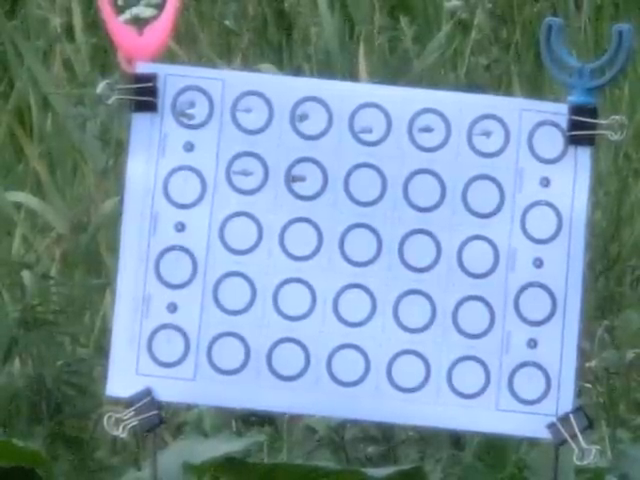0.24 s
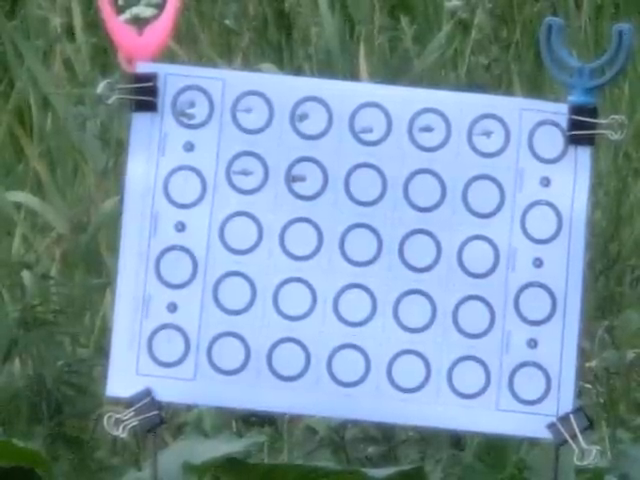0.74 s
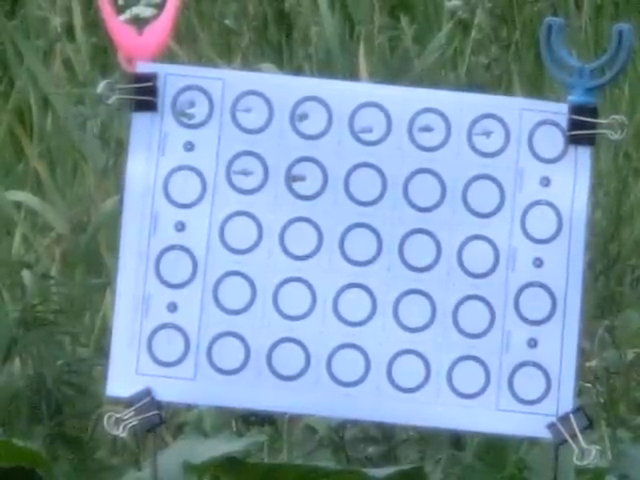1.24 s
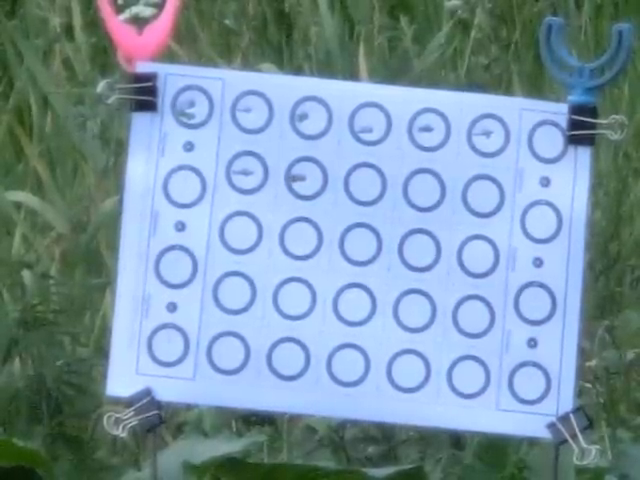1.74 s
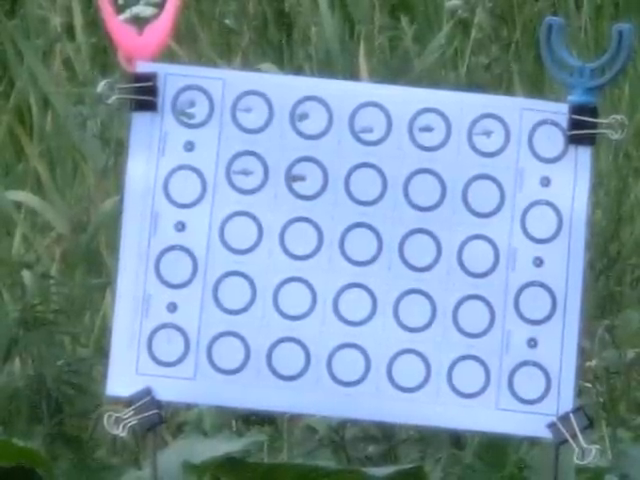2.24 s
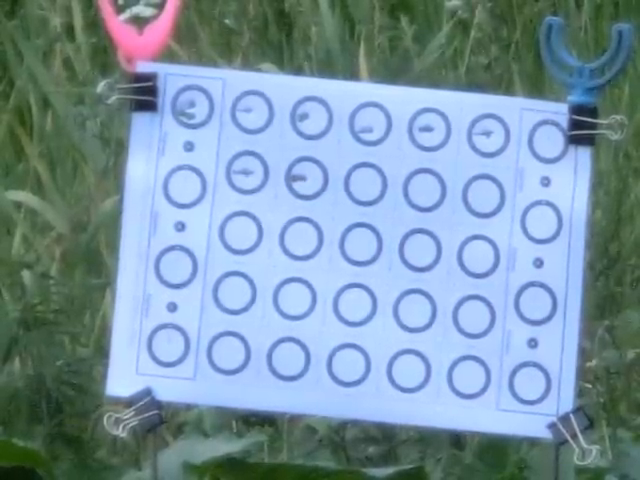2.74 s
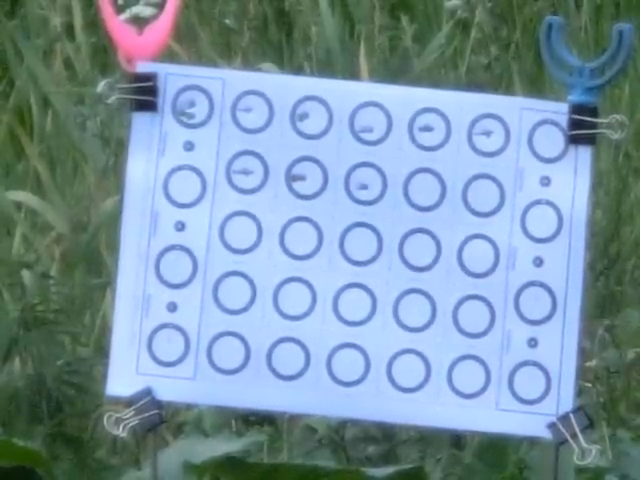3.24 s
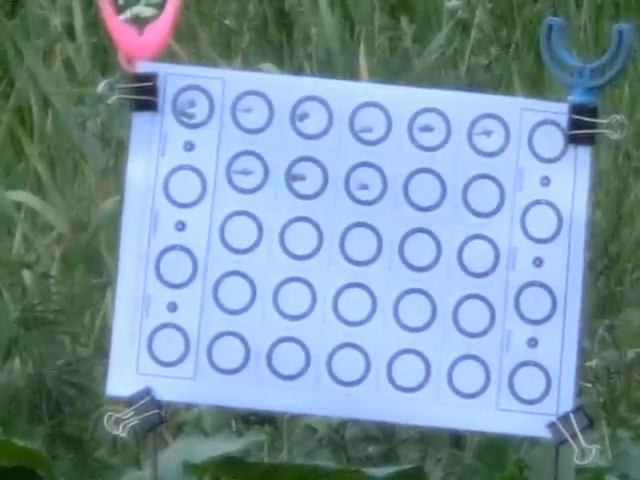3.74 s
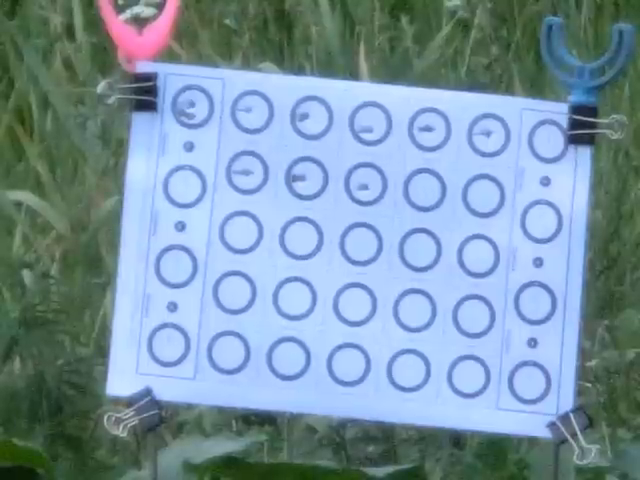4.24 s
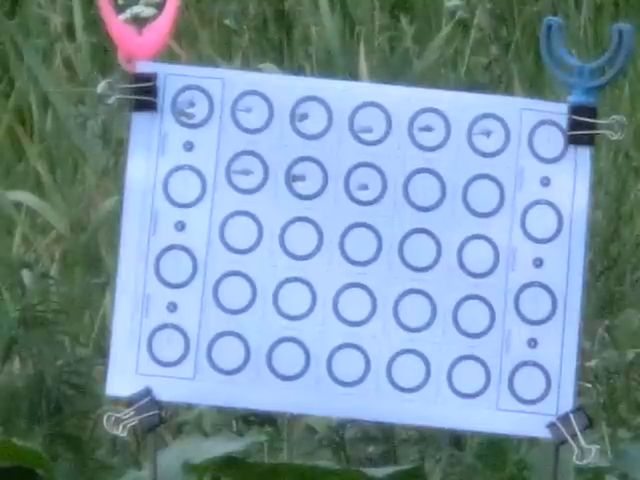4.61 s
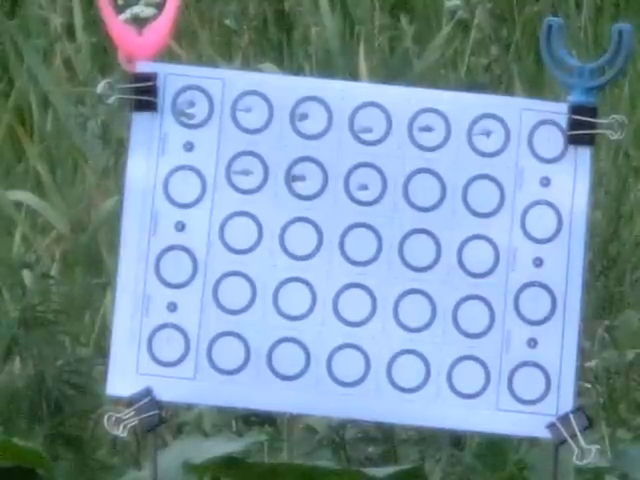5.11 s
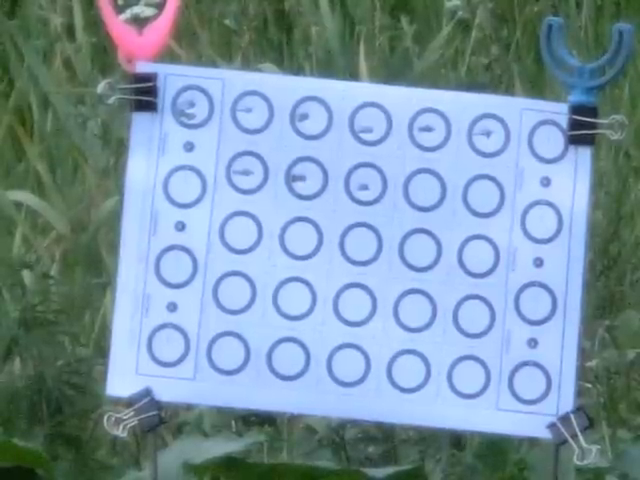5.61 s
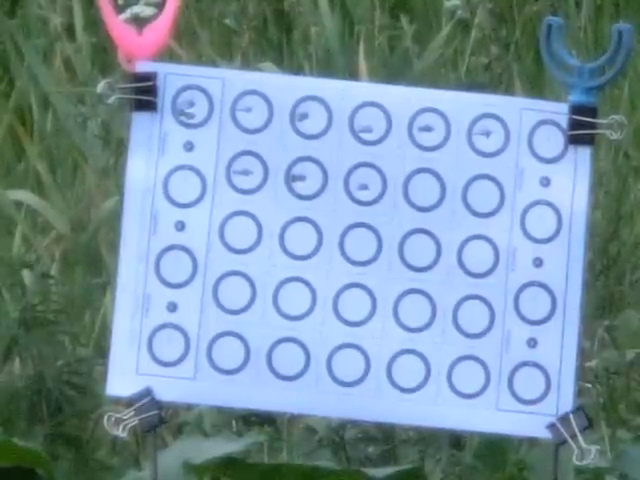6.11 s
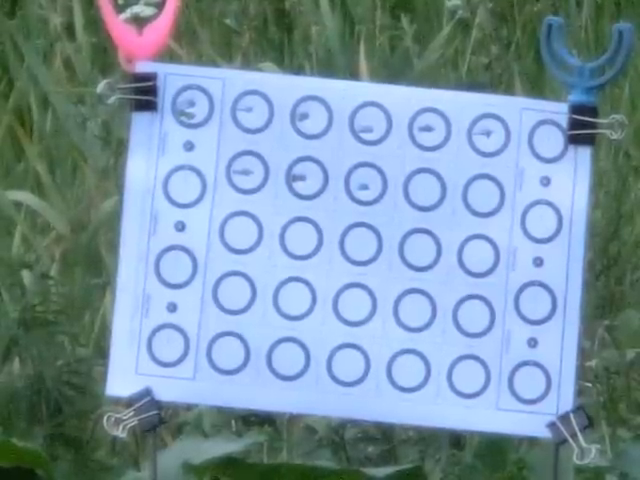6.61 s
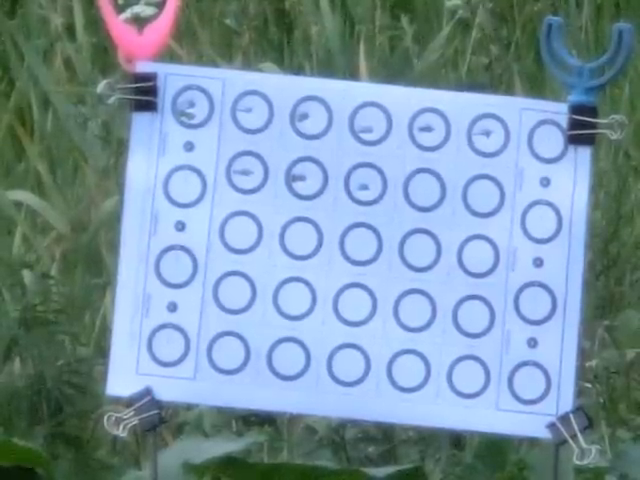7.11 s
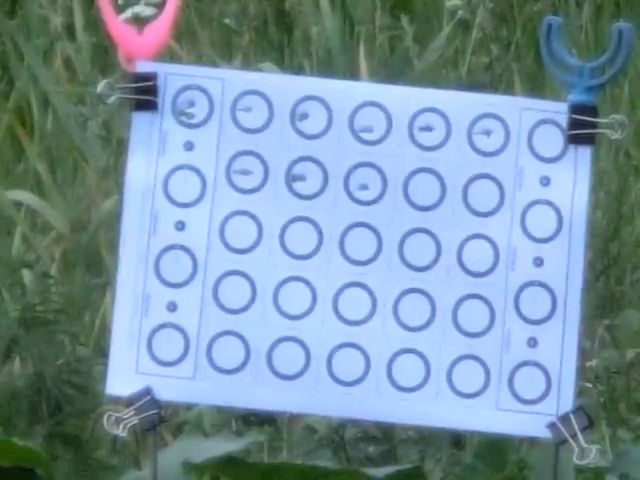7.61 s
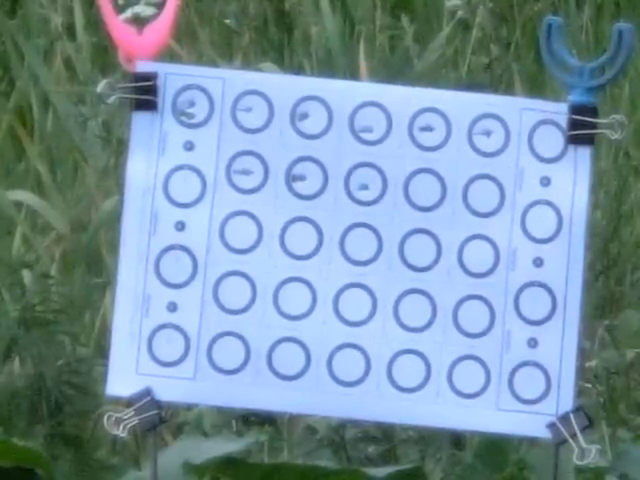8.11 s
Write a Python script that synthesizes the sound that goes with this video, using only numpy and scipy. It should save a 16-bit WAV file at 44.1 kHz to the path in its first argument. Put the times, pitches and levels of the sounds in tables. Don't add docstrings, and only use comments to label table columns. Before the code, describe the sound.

From 0 to 3.1 seconds a quiet meadow: a distant car swells gently closer, peaking near 2.7, with a hollow road wash, low uneven engine throb, light wind, hiss and dry high grasshopper rasps. At 3.16 a pellet hits card right beside the stereo microphone: an extremely loud, clipped, ripping slap with a brief board ring, air thump and bright grassy scatter. About 0.16 seconds later, at 3.32, comes a thin, bass-less rifle crack from afar, with a hissing field echo fading over roughly half a second. The background is suddenly hushed and slowly creeps back. Faint buffeting flutter follows from 3.6. Small steel ticks and bolt knocks come from 3.6 to 4.85, clustered near 4.1, 4.3 and 4.7, ending with a firmer clack. Afterwards the car recedes, far traffic swells near 5.6, 6.2 and 7.2, grasshoppers rasp, and faint bird trills and chirps sound around 6.5 to 7.3, until 8.4.

```python
import sys
import numpy as np
from scipy import signal
from scipy.io import wavfile
from scipy.ndimage import uniform_filter1d

SR = 44100
rng = np.random.default_rng(int(sys.argv[2]) if len(sys.argv) > 2 else 0)


def invert_db(level):
    return 10 ** (np.asarray(level, dtype=float) / 20)


def master(y):
    cut = np.clip(np.atleast_2d(y).T, -1, 1)
    pcm = np.round(cut * 32767)
    wavfile.write(sys.argv[1], SR, pcm.astype(np.int16))


N = 368676
SMACK_S = 3.163


def evened(x):
    return x / np.sqrt(np.mean(x ** 2) + 1e-20)


def read(points, hz):
    f, value = np.transpose(points)
    return np.interp(np.log(hz + 1), np.log(f + 1), value)


def add(mix, s, sound):
    part = mix[:, round(s * SR):][:, :sound.shape[-1]]
    part += sound[..., :part.shape[1]]


def noise(count, size, colour, same, field=lambda hz, t: 1):
    hop = size // 4
    hz = np.fft.rfftfreq(size, 1 / SR)[:, None]
    frames = count // hop + 6
    a, b, c, d = rng.standard_normal((frames, len(hz), 4)).T
    left = a + 1j * b
    like = np.clip(read(same, hz), -1, 1)
    right = like * left + np.sqrt(1 - like ** 2) * (c + 1j * d)
    tint = invert_db(read(colour, hz))
    scale = np.sqrt(2 / 3 * np.sum(tint ** 2))
    z = np.array([left, right]) * tint * field(hz, np.arange(frames) * hop / SR)
    return signal.istft(z, nperseg=size, noverlap=size - hop)[1][:, :count] / scale


def lumps(hz, t, frames, bins):
    patches = rng.standard_normal((len(t), len(hz)))
    patches = uniform_filter1d(patches, frames, 0)
    return evened(uniform_filter1d(patches, bins, 1).T)


def swells(rows, t):
    return sum(db * np.exp(-((t - s) / width) ** 2) for s, db, width in rows)


# pitch_hz, level_db per Hz
HISS_COLOUR = [(300, -10), (2000, 0.5), (5000, -2), (9000, -3), (14000, -3.5), (15000, -6), (16000, -12.5)]
# pitch_hz, level_db per Hz
WIND_COLOUR = [(3, -5.5), (8, 1), (20, -2.5), (45, -12.5), (120, -26), (300, -36.5), (600, -60)]


def ports():
    hiss_db, wind_db = -65, -54.5
    apart = [(10, 0.2209), (100, 0.2), (1000, 0)]  # pitch_hz, likeness

    def rolloff(hz, t):
        return invert_db(1.5 - 1.8 * (hz / 10000) ** 2)

    hiss = invert_db(hiss_db) * noise(N, size=1024, colour=HISS_COLOUR, same=apart, field=rolloff)
    return hiss + invert_db(wind_db) * noise(N, size=8192, colour=WIND_COLOUR, same=apart)


# pitch_hz, level_db per Hz
CAR_COLOUR = [(160, -34), (280, -3.5), (427, -12), (935, -0.5), (1100, -6), (1320, -5), (1750, -9),
              (2350, -15.5), (6000, -36.5), (7800, -62.5), (13200, -120)]
# pitch_hz, level_db per Hz
FAR_COLOUR = [(180, -37), (300, -6.5), (327, -7), (393, -15.5), (505, -7), (858, 3), (978, 2), (1490, -6.5),
              (2250, -19), (4000, -37.5), (5200, -65), (8800, -120)]
# pitch_hz, level_db per Hz
WASH_COLOUR = [(30, -8.5), (70, 3), (120, -1), (170, -2.5), (280, -5), (400, -12.5), (520, -35.5)]
# pitch_hz, likeness
ROAD_LIKENESS = [(60, 1), (300, .9), (700, 0.98), (1500, 0.96), (4000, 0.63)]
# time_s, level_db
CAR_PASS = [
    (0, -54),
    (.7, -50.5),
    (1.6, -49),
    (2.7, -46.5),
    (3.3, -49.5),
    (4.6, -49),
    (5.1, -52),
    (6.1, -57.5),
    (8.36, -70.5),
]
# peak_s, rise_db, half_width_s
FAR_SWELLS = [
    (0, 3.2, 0.49),
    (1.9, 8.6, 0.69),
    (5.62, 6.9, 0.33),
    (6.15, 9, 0.5),
    (7.2, 7.86, 0.67),
    (8.2, 6, 0.63),
]


def road():
    far_db, low_db = -57, -55.5
    comb_hz, comb_rise_hz, comb_turn_s, comb_slow_s = 410, 165, 4.5, 1.2
    echo_share = .45

    def car(hz, t):
        spacing = comb_hz + comb_rise_hz / (1 + np.exp((comb_turn_s - t) / comb_slow_s))
        comb = abs(1 + echo_share * np.exp(2j * np.pi * hz / spacing)) / np.sqrt(1 + echo_share ** 2)
        return invert_db(np.interp(t, *np.transpose(CAR_PASS))) * comb

    def patchy(db, rows):
        return lambda hz, t: invert_db(db + swells(rows, t) + 1.5 * lumps(hz, t, frames=30, bins=12))

    near = noise(N, size=1024, colour=CAR_COLOUR, same=ROAD_LIKENESS, field=car)
    far = noise(N, size=1024, colour=FAR_COLOUR, same=ROAD_LIKENESS, field=patchy(far_db, FAR_SWELLS))
    low = noise(N, size=2048, colour=WASH_COLOUR, same=ROAD_LIKENESS, field=patchy(low_db, [(.7, 4.5, .5)]))
    return near + far + low


# pitch_hz, level_db per Hz
ENGINE_COLOUR = [(15, -36), (25, -6), (54, 1.5), (81, 2.5), (108, -1.5), (150, -15), (200, -37.5),
                 (330, -120)]
# peak_s, rise_db, half_width_s
ENGINE_SURGES = [(.2, 4, .3), (1.12, 8.7, 0.14), (1.6, 7.3, 0.17), (2.02, 4.5, .1), (2.42, 3.3, 0.27),
                 (2.9, 4, .15), (4.07, 4.3, .08), (4.62, 9, 0.17), (5.0, 5.1, 0.056), (5.29, 4.93, 0.063),
                 (6.9, 5.1, 0.11), (7.42, 7.2, 0.11), (7.8, 3.9, 0.094)]


def engines():
    bed_db, hush_db, hush_s = -54, -8, .5
    t = np.arange(N) / SR
    hush = hush_db * np.exp(-((t - SMACK_S) / hush_s) ** 2) * (t > SMACK_S)

    def wander(hz, t):
        return invert_db(2.1 * lumps(hz, t, frames=12, bins=2))

    throb = noise(N, size=4096, colour=ENGINE_COLOUR, same=ROAD_LIKENESS, field=wander)
    return invert_db(bed_db + swells(ENGINE_SURGES, t) + hush) * throb


# pitch_hz, level_db per Hz
CHORUS_COLOUR = [(4800, -22.5), (5500, -6), (6300, -0.5), (6900, -6), (7600, -20)]


def chorus():
    def flecks(hz, t):
        return invert_db(2.0 * lumps(hz, t, frames=14, bins=4))

    return invert_db(-78.5) * noise(N, size=512, colour=CHORUS_COLOUR, same=[(5000, .4), (7000, .4)], field=flecks)


# start_s, level_db
HIGHER_RASPS = [(.211, -73), (.321, -73), (.434, -74), (.699, -71), (.954, -69), (1.205, -67),
                (1.465, -68.5), (1.738, -71), (2.277, -75), (4.39, -72), (4.57, -75), (4.956, -73),
                (5.18, -75), (5.401, -73), (5.673, -71), (5.842, -73), (6.106, -73), (6.376, -74),
                (6.623, -76), (6.712, -75), (6.977, -74), (7.26, -76), (7.543, -78), (7.932, -77)]
# start_s, level_db
LOWER_RASPS = [(.545, -77), (1.317, -75), (2.129, -68), (2.42, -69), (2.585, -75), (2.695, -70),
               (3.07, -71), (3.92, -70), (7.116, -78), (7.86, -77), (8.135, -70)]


def grasshoppers():
    high_hz, low_hz, spread_hz, width_hz, sag_hz = 6330, 5700, 80, 340, 500
    rasp_s, ticks_per_s = 0.09, 85
    out = np.zeros((2, N))
    t = np.arange(int(rasp_s * SR)) / SR
    ticks = np.exp(-(t * ticks_per_s % 1) / (ticks_per_s * 0.005))
    swell = np.sin(np.pi * t / rasp_s) ** 0.61
    wing = signal.butter(2, width_hz, fs=SR)
    for rows, wing_hz in (HIGHER_RASPS, high_hz), (LOWER_RASPS, low_hz):
        for s, db in rows:
            hz = wing_hz + spread_hz * rng.standard_normal() + sag_hz * (.5 - t / rasp_s)
            pan_db = rng.uniform(-4.5, 4.)
            a, b = ticks * rng.standard_normal((2, 2, 4410))[..., :len(t)]
            carrier = np.exp(2j * np.pi * np.cumsum(hz) / SR)
            scrape = (signal.lfilter(*wing, a + 1j * b) * carrier).real
            both = evened(scrape + .5 * scrape[::-1])
            add(out, s - .008, invert_db(db + 2.5) * both * swell * invert_db([[pan_db], [-pan_db]]))
    return out


# start_s, level_db, start_hz, end_hz, length_s
BIRD_NOTES = [
    (6.855, -78, 3750, 3300, .02),
    (6.905, -80, 3100, 3200, .04),
    (6.82, -80, 2250, 2100, .03),
    (7.265, -84, 3200, 3600, .02),
    (.16, -83, 3300, 3700, .06),
    (3.77, -84, 2900, 2900, .02),
    (3.13, -66, 5100, 5000, .012),
]
# start_s, level_db, start_hz, end_hz, length_s
BIRD_TRILL = [(6.475 + .027 * k, -82, 5080, 5000, .014) for k in range(4)]


def birds():
    out = np.zeros((2, N))
    for s, db, start_hz, end_hz, length_s in BIRD_NOTES + BIRD_TRILL:
        hz = np.linspace(start_hz, end_hz, int(length_s * SR))
        add(out, s, invert_db(db + 4.) * np.hanning(len(hz)) * np.sin(2 * np.pi * np.cumsum(hz) / SR))
    return out


GUST_JUMPS = [
    (8, 2.2, -1.2),
    (14, -.6, -1.9),
    (29, -.9, -1.6),
    (35, 2.5, 1.8),
    (42, 2, -1.4),
    (44, .8, 1.8),
    (52, 2.1, 1),
]


def resets():
    first_s, count, jump_size, buffer = 3.6338, 63, .0016, 2041
    out = np.zeros((2, N))
    ramp = np.sin(np.pi / 2 * np.arange(buffer) / buffer)
    jumps = rng.uniform(-1, 1, (count, 2))
    for k, left, right in GUST_JUMPS:
        jumps[k] = left, right
    for k, jump in enumerate(jumps):
        add(out, first_s + (k - 1) * (buffer + .05) / SR, -jump_size * np.outer(jump, ramp))
    return out


# start_s, peak_db, pitch_hz, treble_loss_db at 12 kHz
BOLT_KNOCKS = [(4.0329, -51, 3600, 2.5), (4.0972, -47, 5580, 0.5), (4.2854, -63.5, 5810, 2),
               (4.3097, -66.5, 3800, 2), (4.3218, -52.5, 13400, -4), (4.3258, -53, 5490, 5),
               (4.4977, -56, 4500, 6), (4.7091, -61.5, 6370, 2), (4.7227, -49, 7500, -3.5),
               (4.7346, -48, 6000, 0), (4.7851, -59.5, 8760, 4), (4.8496, -42.5, 4320, 7)]
# start_s, peak_db, pitch_hz, pitch_prominence
LOOSE_PINGS = [
    (3.919, -60.5, 2500, 5.),
    (4.064, -69, 6200, 12.),
    (4.258, -68, 5500, 12.),
    (4.675, -70, 4150, 9.),
    (3.6276, -65.5, 12500, 3.1),
    (4.4974, -62, 2500, 4.),
    (4.8502, -54, 2550, 6.),
    (4.851, -47.5, 1850, 14.),
    (4.7227, -58, 2300, 8.),
]
# pitch_hz, level_db per Hz
STEEL_COLOUR = [(1300, -28), (2200, -3.5), (4260, -3.5), (5500, -1.5), (8190, -6), (11500, -4),
                (15400, -10.5)]


def bolt():
    out = np.zeros((2, N))
    t = np.arange(3072) / SR
    steel_same = [(2000, 0.93), (6000, 0.87), (15000, 0.595)]  # pitch_hz, likeness
    # prominence, length_ms and echo_db complete each row
    knocks = [(*row, 1.3, 3.7, -15.5) for row in BOLT_KNOCKS]
    knocks += [(*row[:3], 3., row[3], 3.48, -22) for row in LOOSE_PINGS]
    for s, db, hz, dull_db, ping, ms, echo_db in knocks:
        def tuned(f, _):
            peak = 1 + ping * np.exp(-((f - hz) / 500) ** 2)
            return peak * invert_db(-dull_db * (f / 12000) ** 2)

        u = t * 1000 / ms
        shape = np.minimum(u * 5, 1) * np.exp(-u ** 3)
        rattle = shape * noise(len(t), size=128, colour=STEEL_COLOUR, same=steel_same, field=tuned)
        echo = noise(len(t), size=128, colour=FIELD_COLOUR, same=BRIGHT_LIKENESS)
        echo = echo * invert_db(echo_db - 60 * t / 0.15) * np.minimum(u / 2, 1)
        add(out, s, invert_db(db - 7) * (evened(rattle) * np.sqrt(np.mean(shape ** 2)) + echo))
    return out


def push(ms, count=600):
    u = np.arange(count) / (ms * SR / 1000)
    return (1 - u) * np.exp(-u) * np.minimum(1, (u + .3) * 2.5)


# start_s, level_db, push_ms, left_right_db, left_lag_samples
MUZZLE_CRACKS = [
    (3.32295, -16, .034, 2.5, 0),
    (3.32428, -22.5, .06, -2, 2),
    (3.32472, -31, .04, 1, 2),
]
# start_s, level_db, t60_s
FIELD_RETURNS = [
    (3.323, -51, .15),
    (3.338, -59, 0.33),
    (3.374, -56, 0.88),
    (3.402, -59, .15),
    (3.445, -59.5, 0.49),
    (3.5, -68, 1.6),
]
# pitch_hz, level_db per Hz
FIELD_COLOUR = [(880, -49), (1500, -19), (1540, -25), (2070, -17), (2170, -8.5), (5820, -3), (12500, -0.5),
                (15400, -9.5)]
# pitch_hz, likeness
BRIGHT_LIKENESS = [(100, 0.789), (400, 0.54), (1400, 0.915), (3000, 0.86), (7000, 0.72), (15000, .1)]


def report():
    return_rise_s = .006
    out = np.zeros((2, N))
    t = MUZZLE_CRACKS[0][0] + np.arange(SR) / SR
    thin = signal.butter(2, 1000, "high", fs=SR)
    for s, db, ms, pan_db, lag in MUZZLE_CRACKS:
        crack = signal.lfilter(*thin, -np.roll(push(ms), 3) * 0.29 + np.roll(push(ms), 5))
        left = np.roll(crack, int(lag)) * invert_db(pan_db / 2)
        right = crack * invert_db(-pan_db / 2)
        add(out, s - 4 / SR, invert_db(db) * np.array([left, right]))

    def air(hz, s):
        return invert_db(-45. * s * (hz / 10000) ** 2)

    power = 0
    for s, db, t60 in FIELD_RETURNS:
        rise = np.clip((t - s) / return_rise_s + .2 * (t > s), 0, 1)
        power = power + (rise * invert_db(db - 60 * (t - s) / t60)) ** 2
    echo = noise(len(t), size=256, colour=FIELD_COLOUR, same=BRIGHT_LIKENESS, field=air)
    add(out, t[0], np.sqrt(power) * echo)
    return out


# start_s, level_db, hold_ms
TEAR_STROKES = [
    (3.1619, -24, 1.),
    (3.1633, -6, .7),
    (3.1645, -2, 1.3),
    (3.1662, -4, 1.3),
    (3.1678, -17, 3.),
]


def tearing(t):
    rise_db_per_ms, fall_db_per_ms, lead_db, lead_db_per_ms = 40, 30, -32, 7
    levels = [lead_db - lead_db_per_ms * 1000 * abs(t - TEAR_STROKES[0][0])]
    for s, db, hold_ms in TEAR_STROKES:
        rise = rise_db_per_ms * np.maximum(1000 * (s - t), 0)
        fall = fall_db_per_ms * np.maximum(1000 * (t - s) - hold_ms, 0)
        levels.append(db - rise - fall)
    return invert_db(np.max(levels, 0))


# pitch_hz, level_db per Hz
TEARING_COLOUR = [(1200, -40.5), (2200, -12), (2900, -6.5), (5030, -4.5), (6030, 2), (7000, -3), (8670, -8),
                  (10400, -11), (12700, -2), (15400, -12.5)]
# start_s, ring_db, ring_hz, push_db, push_ms
BOARD_BLOWS = [
    (3.16305, -9, 1700, -13, .7),
    (3.1634, -8, 2870, -40, .5),
    (3.16425, -4, 1600, -13, .9),
    (3.1647, -12, 1180, -40, .5),
]
# pitch_hz, level_db, t60_s (undamped; all are damped to 0.07 s when played)
CARD_MODES = [(4474, -12, 0.36), (5975, 0.5, 0.071), (6837, -7.5, 0.28), (9400, -1.5, 0.071),
              (9916, -13.5, 0.23), (12400, -4.5, 0.081), (12880, -11.5, 5.0), (13500, -13, 0.082)]
# pitch_hz, level_db per Hz
GRASS_COLOUR = [(35, -52.5), (60, -23), (1170, -16.5), (1660, -11), (2900, -11), (3110, -6.5),
                (3490, -12.5), (6100, -3.5), (8640, -8), (12500, -4.5), (15400, -16)]
# pitch_hz, t60_s
GRASS_T60 = [(80, 0.13), (300, .065), (1000, 0.055), (3000, .056), (8000, 0.056), (15000, 0.062)]
# pitch_hz, level_db per Hz
MEADOW_COLOUR = [(1530, -42.5), (2600, -11.5), (4510, -10.5), (6170, -1.5), (7720, -4.5), (9100, -2.5),
                 (10000, -5.5), (12500, -2), (14300, -6.5), (15400, -15)]


def smack():
    board_t60_s, sing_hz, sing_db = .009, 6010, -10
    out = np.zeros((2, N))
    t = np.arange(SR // 4) / SR
    start = TEAR_STROKES[0][0] - .004
    tear_same = [(300, 0.95), (5000, 0.72), (9000, 1.0), (15000, .45)]  # pitch_hz, likeness

    def opening(hz, s):
        return np.where((hz > 8000) & (start + s < 3.1642), invert_db(-13.5), 1)

    tear = noise(2048, size=64, colour=TEARING_COLOUR, same=tear_same, field=opening)
    sing = invert_db(sing_db) * np.sin(2 * np.pi * sing_hz * t[:2048])
    add(out, start, (tear + sing) * tearing(start + t[:2048]))

    for s, ring_db, hz, push_db, ms in BOARD_BLOWS:
        add(out, s, invert_db(ring_db - 60 * t / board_t60_s) * np.sin(2 * np.pi * hz * t))
        shove = np.sin(np.pi * np.minimum(t * 1000 / ms, 1))
        add(out, s - .0001, invert_db([[push_db + .8], [push_db - .8]]) * shove)

    ring = 0
    for hz, db, t60 in CARD_MODES:
        turns = hz * t + rng.random((2, 1)) * 0.37 + rng.random()
        ring = ring + invert_db(db - 60 * t / min(t60, .07)) * np.sin(2 * np.pi * turns)
    add(out, 3.1665, invert_db(-26.5) * ring / np.std(ring[:, :400]))

    def grass_decay(hz, s):
        return invert_db(-60 * s / read(GRASS_T60, hz))

    grass = noise(len(t), size=256, colour=GRASS_COLOUR, same=BRIGHT_LIKENESS, field=grass_decay)
    add(out, 3.1665, invert_db(-13) * grass)
    meadow = noise(len(t), size=256, colour=MEADOW_COLOUR, same=BRIGHT_LIKENESS)
    add(out, 3.17, invert_db(-39.0 - 60 * t / 0.28) * meadow)
    return out


def gain_db(t):
    start_db, creep_db_per_s, drop_s = -11.5, 4, .005
    dropped_db, recover_db_per_s, quicken_db_per_s2 = -21, 1.75, 0.1946
    after = np.maximum(t - SMACK_S, 0)
    low = dropped_db + recover_db_per_s * after + quicken_db_per_s2 * after ** 2
    drop = np.minimum(after / drop_s, 1)
    return (1 - drop) * (start_db + creep_db_per_s * t) + drop * low


def scene():
    gain = invert_db(gain_db(np.arange(N) / SR))
    shot = smack() + report() + bolt()
    surroundings = road() + ports() + chorus() + engines() + grasshoppers()
    return gain * surroundings + resets() + birds() + shot


def band_limit(x):
    return signal.sosfilt(signal.butter(12, 15600, fs=SR, output="sos"), x)


def record(dry):
    mix = np.clip(dry, -1, 1)
    return band_limit(mix)


dry = scene()
out = record(dry)
master(out)
```